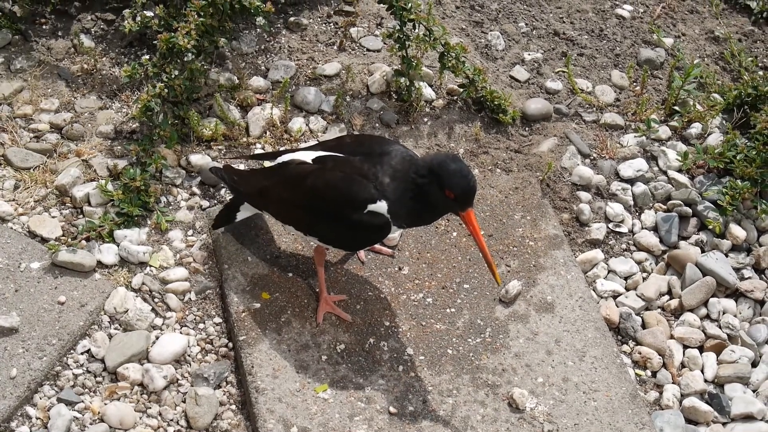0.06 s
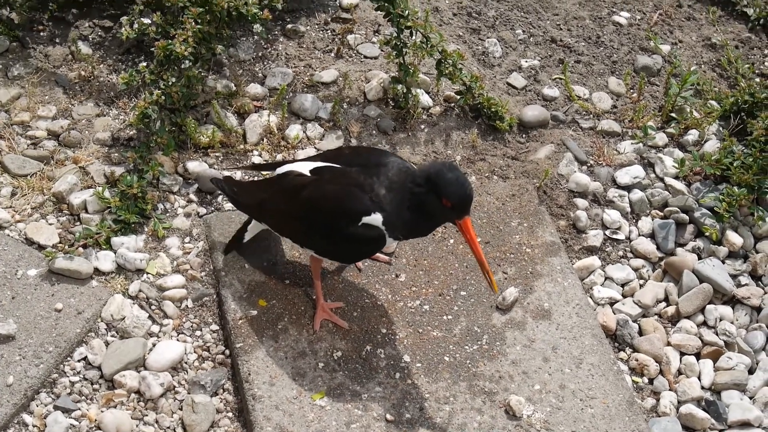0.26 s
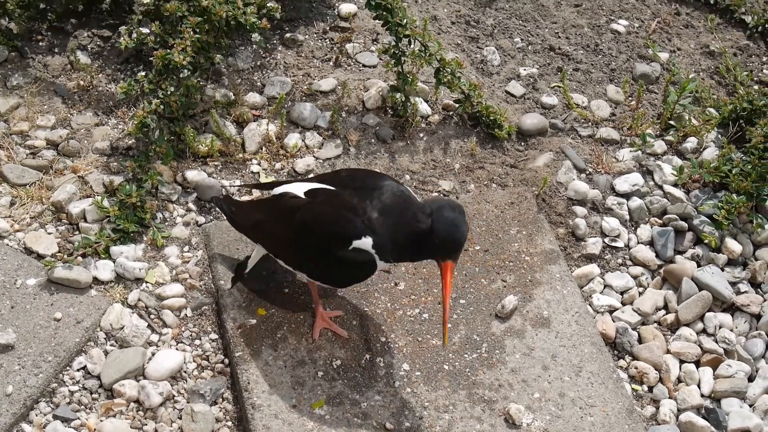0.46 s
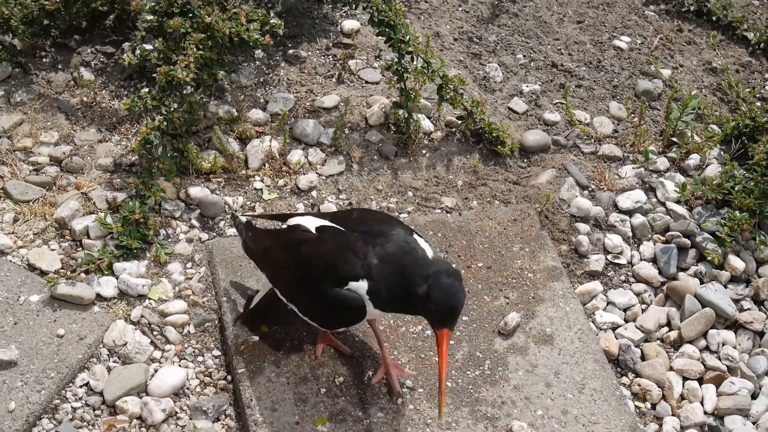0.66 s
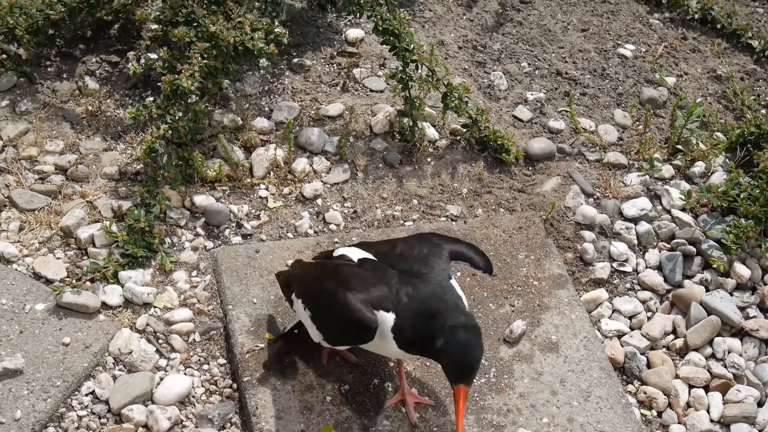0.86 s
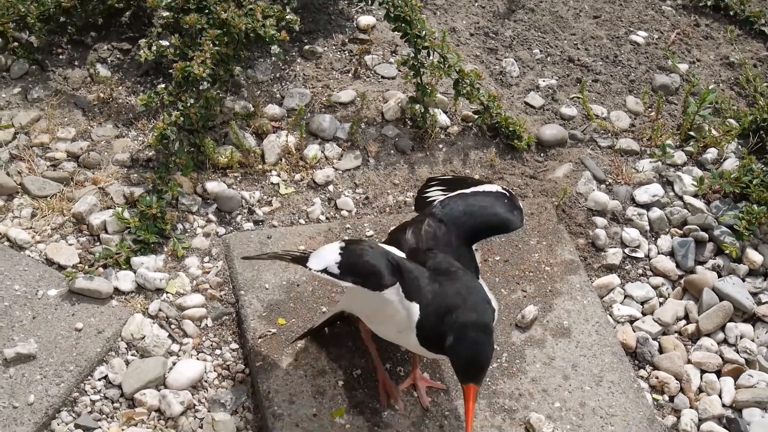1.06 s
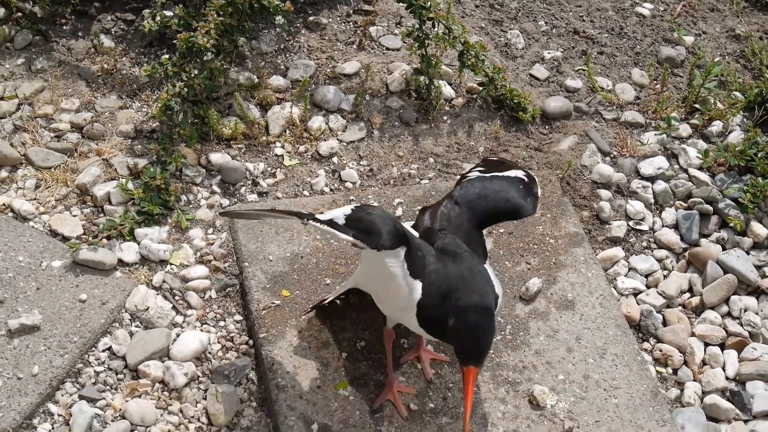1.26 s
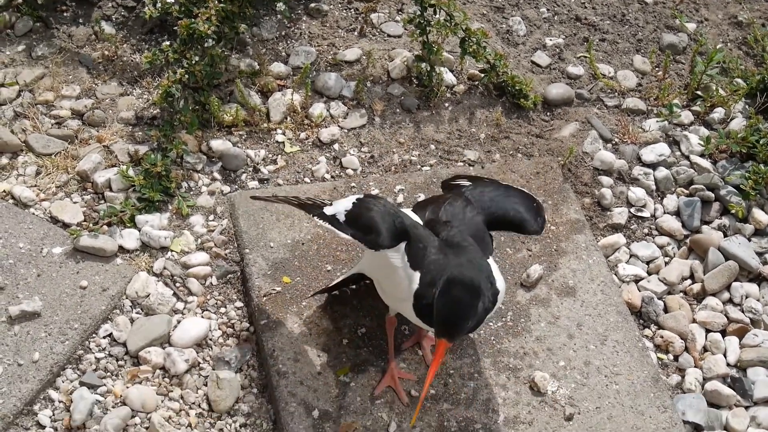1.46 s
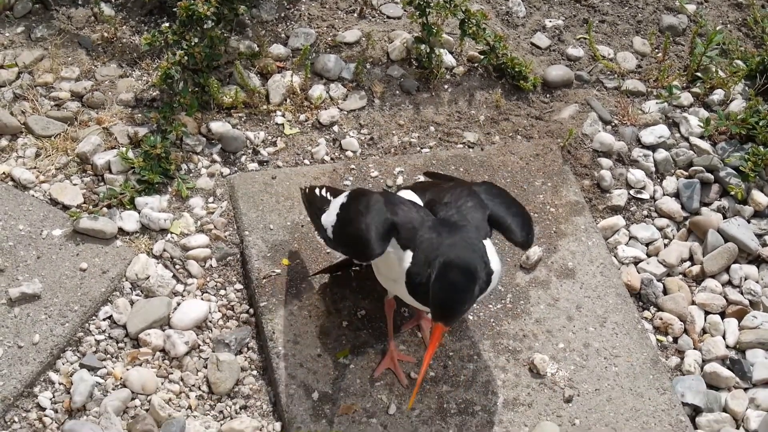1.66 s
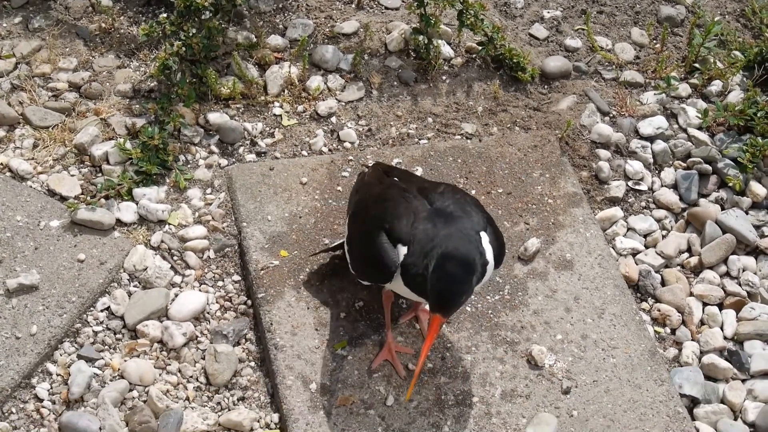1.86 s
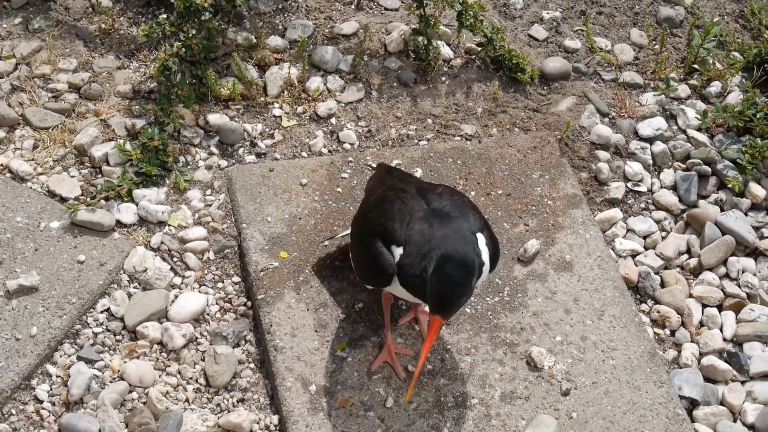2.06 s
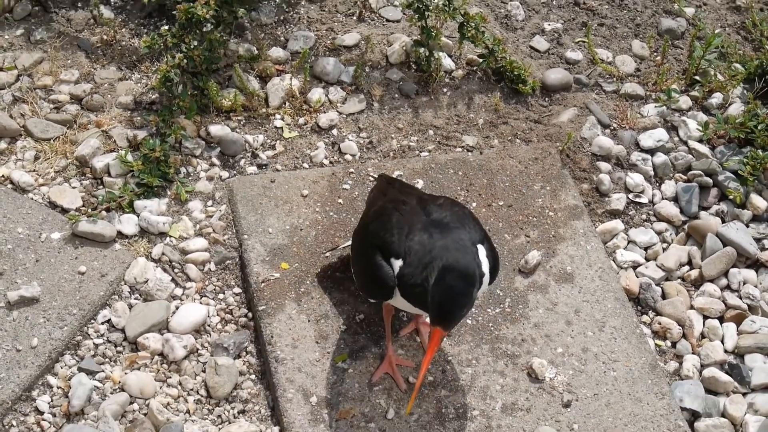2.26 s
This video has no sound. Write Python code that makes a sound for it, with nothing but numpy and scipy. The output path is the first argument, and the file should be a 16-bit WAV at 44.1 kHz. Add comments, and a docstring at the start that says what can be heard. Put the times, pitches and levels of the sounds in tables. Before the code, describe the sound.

Sharp, high shore-bird pips, each a tiny blip flipping up to a whistle and falling, sound close in a stony garden. Quick pairs come at 0.2 and 0.6 s, singles at 0.9, 1.3, 1.5 and 1.9 s, with bright reflections and faint echo. Very faint far pips come at 1.1 and 2.1 s, soft rustles at 1.2 and 1.5 s, a ticking buzz from 1.6 s, over quiet rumble and hiss.

```python
"""Oystercatchers pipe sharp calls close by in a garden, over low outdoor rumble and thin hiss: two overlapping
pairs, then single calls, each a low register that flips to a high whistle, mostly arched, and drops away.
Paving and walls scatter every call, and a long faint echo follows. A far arched pip comes at 1.1 s, a soft
rustle of noise at 1.2 s and another with the call at 1.5 s; a ticking buzz of decaying sines starts at 1.64 s,
the last call comes at 1.93 s and a second far pip at 2.1 s. Gain control dips on loud sound."""
import sys
import numpy as np
from scipy import signal
from scipy.fft import rfft, irfft
from scipy.io import wavfile
from scipy.ndimage import uniform_filter1d

SR = 44100
rng = np.random.default_rng(int(sys.argv[2]) if len(sys.argv) > 2 else 0)


def pcm_store(signal):
    """Save signal as 16-bit PCM."""
    levels = np.round(np.clip(np.atleast_2d(signal), -1, 1) * 32767)
    wavfile.write(sys.argv[1], SR, levels.astype(np.int16).T)


N = 101430


def amp(db):
    """Decibels to gain."""
    return 10 ** (np.asarray(db) / 20)


def evened(x):
    """Scales to unit rms."""
    return x / np.sqrt(np.mean(x ** 2) + 1e-20)


def read(points, hz):
    """Reads a table on a log-frequency axis."""
    f, value = np.transpose(points)
    return np.interp(np.log(hz + 1), np.log(f + 1), value)


def add(mix, start_s, sound):
    """Mixes a sound in at a time."""
    part = mix[:, max(round(start_s * SR), 0):][:, :sound.shape[-1]]
    part += sound[..., :part.shape[1]]


def colour(x, points, share=1):
    """Filters by a share of a table of dB."""
    size = 2 * x.shape[-1]
    gain = amp(share * read(points, np.fft.rfftfreq(size, 1 / SR)))
    return irfft(rfft(x, size) * gain, size)[..., :size // 2]


def step(t, width_s):
    """A smooth step from 0 to 1 around t = 0."""
    return .5 + .5 * np.tanh(2 * t / width_s)


FLUTTER_HZ = 756  # half gain


def flutter(size):
    """Quick random unsteadiness of the voice: low-passed noise at unit rms."""
    hz = np.fft.rfftfreq(size, 1 / SR)
    spectrum = rfft(rng.standard_normal(size)) / (1 + (hz / FLUTTER_HZ) ** 2)
    return evened(irfft(spectrum, size))


# Near calls. Each row: start, register break, crest and end in seconds, pitch at the start, before the break,
# after the break, at the crest and at the end in Hz, level of the low register, level of the high register,
# fade by the end, octave in the low register, octave in the high register, top harmonics and lead-in in dB,
# roughness from 0 to 1.
CALLS = [ (0.2086, 0.2218, .231, .256, 2474, 2925, 3278, 3505, 2250, -3.5, -7.5, -9.5, -7, -4, -2, -2.5, 0.1),
         (0.238, 0.243, .243, .266, 2624, 2892, 3300, 3300, 2715, -15, -10.5, -10, 1, -8, 5.5, -25, 0.12),
         (0.5949, 0.6012, .617, .642, 2582, 2670, 3282, 3440, 2740, -2.5, -10.5, -15.5, -2.5, 1.5, -3, -17.5, 0.17),
         (0.623, 0.625, .633, .652, 2619, 2800, 3250, 3258, 2226, -39.5, -15, -15.5, -9, -15.5, 13, -23.5, 0.2),
         (0.8764, 0.8916, .906, .933, 2555, 2664, 3254, 3336, 1913, -11.5, -11, -14, -2.5, -5, 3, -20.5, 0.12),
         (1.3010, 1.306, 1.328, 1.341, 2305, 2463, 3017, 3403, 3010, -4.5, -8.5, -13, -2, -0.5, -2.5, -16, 0.1),
         (1.5111, 1.521, 1.532, 1.555, 2606, 2827, 3274, 3300, 2167, -13, -6.5, -20.5, 1.5, -10, 3, -25, 0.13),
         (1.932, 1.938, 1.954, 1.973, 2404, 2960, 2920, 3147, 2730, -14.5, -7.5, -9, 0.5, -4.5, 2.5, -15.5, 0.07)]
# Source strength of harmonics 1 to 5 in dB.
HARMONICS_DB = [-3.5, -4, -17, -29, -33.5]
# Colour of throat and bill. Each row: frequency in Hz, gain in dB.
THROAT_DB = [(1400, -20), (2000, -11), (2500, -1.5), (3400, -1.5), (4100, -19), (4700, -2), (5200, -2),
             (6000, -3.5), (6900, 1), (7300, 6), (7700, -3), (8600, -7.5), (10000, -2.5), (11500, 2),
             (13500, -16)]
# Relative spectrum of the air noise in a call. Each row: frequency in Hz, density in dB per Hz.
RASP_SPECTRUM_DB = [(400, -36.5), (1400, -14.5), (2600, 30.5), (3400, 1), (4000, -16.5), (5400, 1.5),
                    (8000, -4.5), (11000, -3.5), (13500, -11.5), (15000, -44)]
RASP_DB = -21  # at full roughness
ATTACK_S, RELEASE_S, BREAK_S = 0.0011, .0027, 0.0013
LEAD_S, LEAD_GLIDE_S, LEAD_GLIDE_AHEAD_S = 0.0067, 0.00044, 0.001556
LEAD_DROP_SHARE = 0.36  # lowers the pitch of the lead-in
RISE_POWER, FALL_POWER, FADE_POWER = 1.3, 2.7, 4.2
BREAK_DIP_DB = -1.5
FALL_ROUGH = 0.17  # roughness added by the end of the fall
JITTER_SHARE, SHIMMER_SHARE, UPPER_SHIMMER_SHARE = 0.061, 0.26, 1.6  # rms at full roughness
UPPER_SHARE = 0.89  # how far harmonics 3 to 5 follow the octave's dB


def pipe(start, jump, crest, end, first_hz, before_hz, after_hz, crest_hz, last_hz,
         low_db, high_db, fade_db, low_over_db, high_over_db, top_db, lead_db, rough):
    """One call: a brief lower-pitched lead-in, strong in the first call and faint in most others, then the
    low register of the syrinx, a flip to the high one, and a fall."""
    t = np.arange(start - LEAD_S, end + RELEASE_S, 1 / SR)
    high = step(t - jump, BREAK_S)

    lead_pitch = 1 - LEAD_DROP_SHARE * step(start - LEAD_GLIDE_AHEAD_S - t, 2 * LEAD_GLIDE_S)
    low_hz = np.interp(t, [start, jump], [first_hz, before_hz]) * lead_pitch
    rise = np.clip((crest - t) / (crest - jump), 0, 1) ** RISE_POWER
    fall = np.clip((t - crest) / (end - crest), 0, 1) ** FALL_POWER
    high_hz = crest_hz + (after_hz - crest_hz) * rise + (last_hz - crest_hz) * fall
    rough = np.clip(rough + FALL_ROUGH * fall, 0, 1)
    hz = low_hz + (high_hz - low_hz) * high
    hz = hz * (1 + JITTER_SHARE * rough * flutter(len(t)))
    phase = 2 * np.pi * np.cumsum(hz) / SR

    fade = fade_db * np.clip((t - jump) / (end - jump), 0, 1) ** FADE_POWER
    level_db = low_db + (high_db + fade - low_db) * high
    level_db = level_db + BREAK_DIP_DB * np.sin(np.pi * high)
    level_db = level_db + lead_db * step(start - t, ATTACK_S)
    fade_in = np.clip((t - t[0]) / LEAD_S, 0, 1) ** 2
    fade_out = np.clip((t[-1] - t) / (2 * RELEASE_S), 0, 1)

    over_db = low_over_db + (high_over_db - low_over_db) * high
    rasp = evened(colour(rng.standard_normal(len(t)), RASP_SPECTRUM_DB))
    voice = rough * amp(RASP_DB) * rasp
    for k, own_db in enumerate(HARMONICS_DB, 1):
        if k == 1:
            bright_db = 0
        elif k == 2:
            bright_db = over_db
        else:
            bright_db = top_db + UPPER_SHARE * over_db
        shimmer = rough * (SHIMMER_SHARE if k <= 2 else UPPER_SHIMMER_SHARE)
        gain = amp(own_db + bright_db + read(THROAT_DB, k * hz))
        voice = voice + gain * (1 + shimmer * flutter(len(t))) * np.sin(k * phase)
    return t[0], amp(level_db) * fade_in * fade_out * voice


# Far calls. Each row: start in seconds, length in seconds, crest pitch in Hz, level of the octave in dB.
FAR_CALLS = [(1.075, 0.036, 3870, -76.5), (2.096, 0.07, 3780, -73)]
FAR_ARCH_SHARE, FAR_FUNDAMENTAL_DB = .12, -12.5  # fundamental relative to the octave


def far_pips():
    """Faint calls from a bird further off: an arched tone with a stronger octave."""
    out = np.zeros((1, N))
    for start_s, length_s, crest_hz, db in FAR_CALLS:
        u = np.arange(0, length_s, 1 / SR) / length_s
        hz = crest_hz * (1 - FAR_ARCH_SHARE * (2 * u - 1) ** 2)
        phase = 2 * np.pi * np.cumsum(hz) / SR
        tone = amp(FAR_FUNDAMENTAL_DB) * np.sin(phase) + np.sin(2 * phase)
        add(out, start_s, amp(db) * np.sin(np.pi * u) ** .5 * tone)
    return out


# Left-right likeness of the echoes. Each row: frequency in Hz, likeness from 0 to 1.
ECHO_LIKENESS_BY_HZ = [(2500, 0.79), (6000, .6), (10000, 0.11)]


def scatter(size):
    """Two channels of dense random echoes, less alike in the treble."""
    a, b = rfft(rng.standard_normal((2, size)))
    same = np.clip(read(ECHO_LIKENESS_BY_HZ, np.fft.rfftfreq(size, 1 / SR)), 0, 1)
    return irfft(np.array([a, same * a + np.sqrt(1 - same ** 2) * b]), size)


# Single reflections off paving and walls. Each row: delay in seconds, level in dB, right-ear lag in seconds.
BOUNCES = [(.0042, -13, .00007), (.0075, -17.5, -.00009), (0.0112, -11.5, .00011), (0.022, -37, -.00007)]
# Bright quick scatter off gravel. Each row: frequency in Hz, gain in dB.
NEAR_COLOUR_DB = [(2500, -2), (3400, -2.5), (5200, -2.5), (7000, 1.5), (10000, 5), (13000, 6.5)]
# Decay of the long echo. Each row: frequency in Hz, time to fall 60 dB in seconds.
FAR_T60_S = [(2000, 0.49), (3300, 1), (6700, 0.72), (10000, 0.43), (14000, 0.12)]
# Colour of the long echo. Each row: frequency in Hz, gain in dB.
FAR_COLOUR_DB = [(2000, -10), (2400, -17), (2650, -11), (3000, -4.5), (3300, -4.5), (4700, -26.5),
                 (5250, -18), (6000, -8.5), (6800, -3.5), (7800, -11), (10000, 2), (14000, -4)]
NEAR_DB, NEAR_T60_S = -8, 0.15
FAR_DB, FAR_ONSET_S = -37.5, 0.09
WALL_DB, WALL_S, WALL_SPREAD_S = -43.5, 0.1954, 0.043


def garden(x):
    """Direct sound, single reflections, quick scatter, a far wall and a long faint echo, by convolution."""
    t = np.arange(SR) / SR
    near = colour(scatter(SR), NEAR_COLOUR_DB) * amp(-60 * t / NEAR_T60_S) * step(t - .006, 0.001)
    wall = scatter(SR) * np.exp(-((t - WALL_S) / WALL_SPREAD_S) ** 2)
    hz, when_s, z = signal.stft(scatter(SR), SR, nperseg=256)
    decay = amp(-60 * when_s / read(FAR_T60_S, hz)[:, None])
    far = signal.istft(z * decay, SR)[1][:, :SR] * np.minimum(t / FAR_ONSET_S, 1)
    far = colour(far, FAR_COLOUR_DB)
    parts = [(NEAR_DB, near), (FAR_DB, far), (WALL_DB, wall)]
    response = sum(amp(db) * part / np.linalg.norm(part[0]) for db, part in parts)
    response[:, 0] += 1  # direct sound
    for delay_s, db, lag_s in BOUNCES:
        response[[0, 1], [round(delay_s * SR), round((delay_s + lag_s) * SR)]] += amp(db)
    return signal.fftconvolve(x, response, axes=1)[:, :N]


# Rustles as the bird steps and moves its wing. Each row: centre in seconds, width in seconds, peak level in dB.
RUSTLE_SWELLS = [(1.20, .04, -69.5), (1.505, 0.036, -59)]
# Relative spectrum of the rustles. Each row: frequency in Hz, density in dB per Hz.
RUSTLE_SPECTRUM_DB = [(200, -20.5), (450, -3.5), (680, 8.5), (1100, -8), (2000, -14), (6000, -35)]


def rustles():
    """Short, dull swells of noise from feet and feathers."""
    t = np.arange(N) / SR
    level = sum(amp(db) * np.exp(-((t - centre_s) / width_s) ** 2) for centre_s, width_s, db in RUSTLE_SWELLS)
    return level * evened(colour(rng.standard_normal(N), RUSTLE_SPECTRUM_DB))


BUZZ_DB, BUZZ_SPREAD_DB, BUZZ_HZ = -55, 2, 2250
BUZZ_FROM_S, BUZZ_PERIOD_S, BUZZ_DECAY_S = 1.64, .02, 0.0012


def buzz():
    """A very faint buzz: evenly spaced, decaying sine ticks of slightly random level."""
    out = np.zeros((1, N))
    t = np.arange(0, BUZZ_PERIOD_S, 1 / SR)
    tick = np.exp(-t / BUZZ_DECAY_S) * np.sin(2 * np.pi * BUZZ_HZ * t)
    for start_s in np.arange(BUZZ_FROM_S, N / SR, BUZZ_PERIOD_S):
        add(out, start_s, amp(BUZZ_DB + BUZZ_SPREAD_DB * rng.standard_normal()) * tick)
    return out


# Relative spectrum of the outdoor noise. Each row: frequency in Hz, density in dB per Hz.
AIR_SPECTRUM_DB = [(25, -21), (55, -18.5), (85, -2), (170, -2.5), (350, -11), (550, -14.5), (700, -9.5),
                   (1050, -14.5), (1600, -16), (2600, -18), (3000, -13), (3300, -12), (3700, -30),
                   (6000, -31.5), (6700, -25.5), (7500, -33.5), (13700, -38.5)]
# Course of the outdoor noise. Each row: time in seconds, level in dB before swell and pan.
AIR_LEVEL_DB = [(0, -58.5), (0.551, -58), (.8, -60.5), (1.248, -59), (1.699, -60), (2.3, -60)]
# Left-right likeness of the outdoor noise. Each row: frequency in Hz, likeness from 0 to 1.
AIR_LIKENESS_BY_HZ = [(30, .7), (80, 1), (300, 0.76), (1500, 0.88), (8000, .4)]
AIR_PAN_DB, AIR_PATCH_DB = 1, 2  # left minus right; rms of the patches
AIR_SWELL_DB, AIR_SWELL_S = -0.97, 0.14


def air():
    """Low outdoor rumble and thin hiss: shaped noise drifting in time-frequency patches."""
    hz = np.fft.rfftfreq(2048, 1 / SR)
    a, b, c, d, patches = rng.standard_normal((5, N // 512 + 5, len(hz)))
    patches = uniform_filter1d(patches, size=8, axis=0)
    patches = evened(uniform_filter1d(patches, size=12, axis=1))
    same = np.clip(read(AIR_LIKENESS_BY_HZ, hz), 0, 1)
    left = a + 1j * b
    right = same * left + np.sqrt(1 - same ** 2) * (c + 1j * d)
    z = np.array([left, right]) * amp(read(AIR_SPECTRUM_DB, hz) + AIR_PATCH_DB * patches)
    noise = evened(signal.istft(z.swapaxes(1, 2), nperseg=2048, noverlap=1536)[1][:, :N])
    swell_size = max(round(AIR_SWELL_S * SR), 1)
    swell = evened(uniform_filter1d(rng.standard_normal(N), size=swell_size, mode="wrap"))
    level_db = np.interp(np.arange(N) / SR, *np.transpose(AIR_LEVEL_DB))
    pan_db = AIR_PAN_DB * np.array([[.5], [-.5]])
    return noise * amp(AIR_SWELL_DB * swell + level_db + pan_db)


# Stereo place of the birds. Each row: frequency in Hz, left minus right in dB.
BIRD_PAN_DB = [(1500, 4.5), (2600, 0), (3300, 2.5), (5200, 2.5), (6800, 4.5), (8000, 16), (9000, -6),
               (10500, -10), (13000, -8)]


def scene():
    """The birds in the garden over the outdoor background."""
    birds = far_pips()
    for row in CALLS:
        add(birds, *pipe(*row))
    left, right = garden(birds)
    placed = np.array([colour(left, BIRD_PAN_DB, .5), colour(right, BIRD_PAN_DB, -.5)])
    return placed + air() + buzz() + rustles()


THRESHOLD_DB, SQUEEZE_DB_PER_DB = -23, 0.55
CLAMP_S, RECOVER_DB_PER_S = 0.0064, 26
EDGE_HZ = 13900


def record(dry):
    """Gain control clamps on sound above the threshold and recovers slowly; then a low-pass limits the band."""
    power_db = 10 * np.log10(abs(uniform_filter1d((dry ** 2).mean(0), size=88)) + 1e-12)
    wanted_cut_db = SQUEEZE_DB_PER_DB * np.maximum(power_db - THRESHOLD_DB, 0)
    # a running maximum on a rising ramp lets the cut fall only at the recovery rate
    recovery_db = np.arange(N) / SR * RECOVER_DB_PER_S
    cut_db = np.maximum.accumulate(wanted_cut_db + recovery_db) - recovery_db
    lag = np.exp(-1 / (CLAMP_S * SR))
    held = dry * amp(-signal.lfilter([1 - lag], [1, -lag], cut_db))
    low_pass = signal.firwin(301, EDGE_HZ, window=("kaiser", 8), fs=SR)
    return signal.oaconvolve(held, low_pass[None], "same")


dry = scene()
out = record(dry)
pcm_store(out)
```